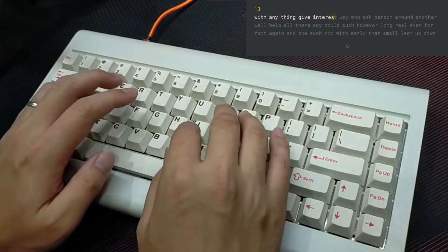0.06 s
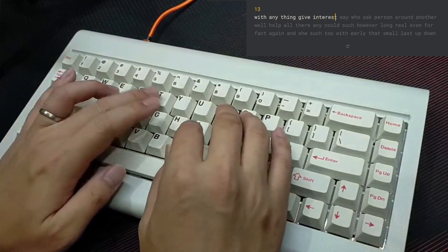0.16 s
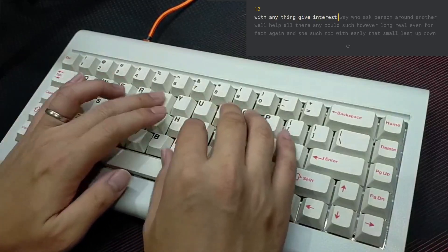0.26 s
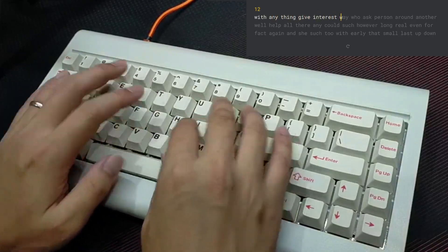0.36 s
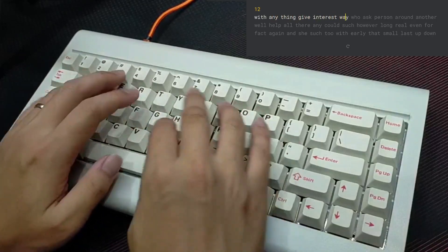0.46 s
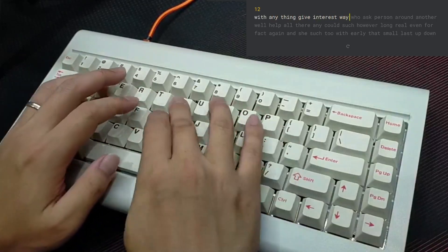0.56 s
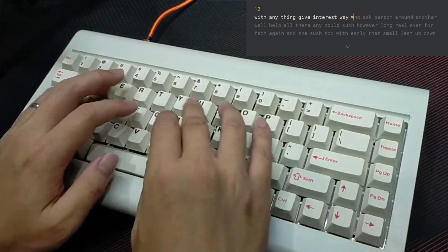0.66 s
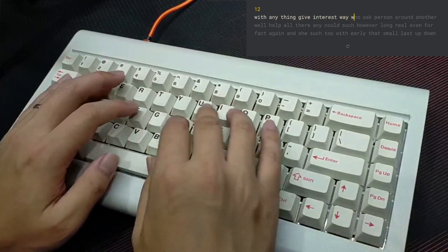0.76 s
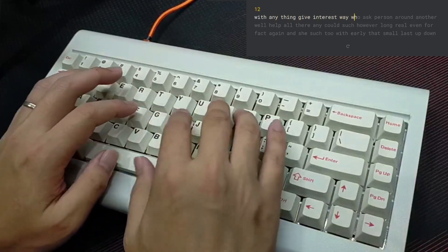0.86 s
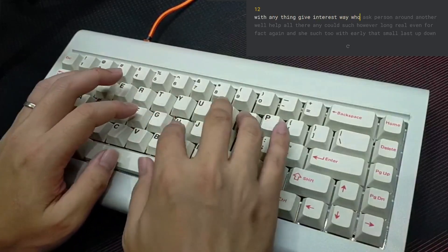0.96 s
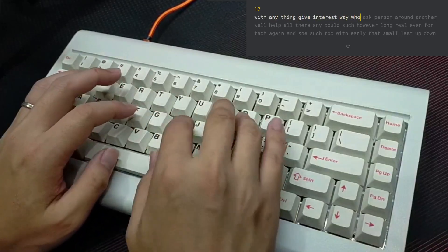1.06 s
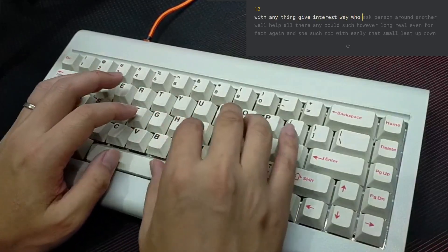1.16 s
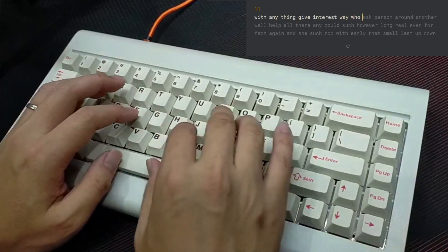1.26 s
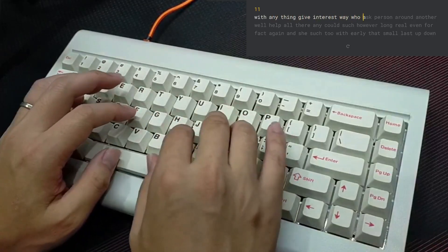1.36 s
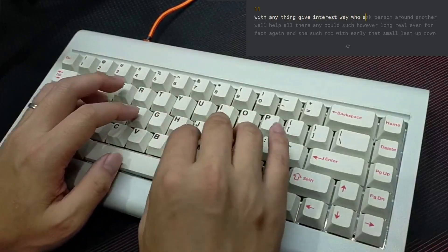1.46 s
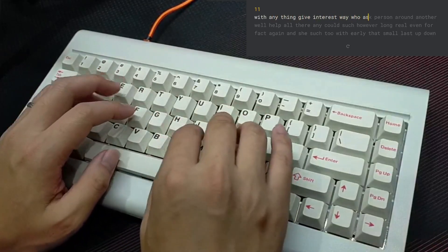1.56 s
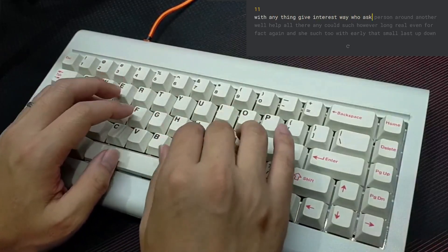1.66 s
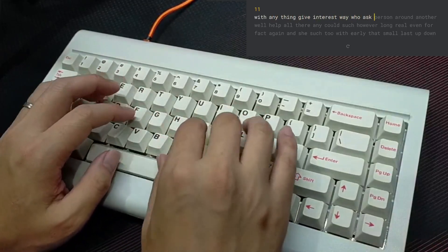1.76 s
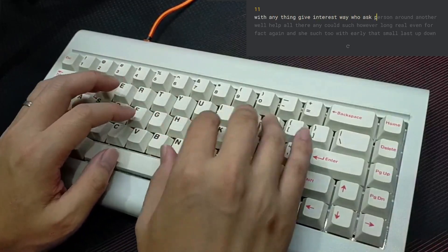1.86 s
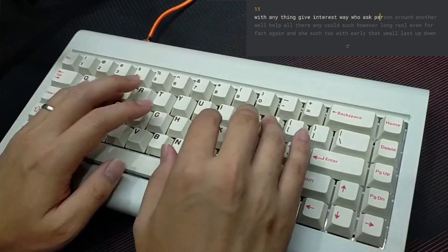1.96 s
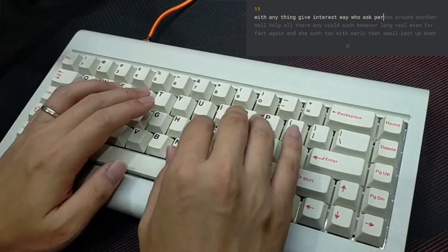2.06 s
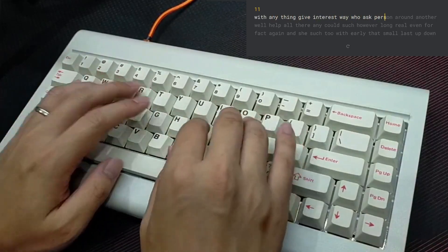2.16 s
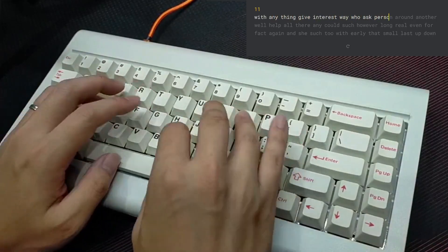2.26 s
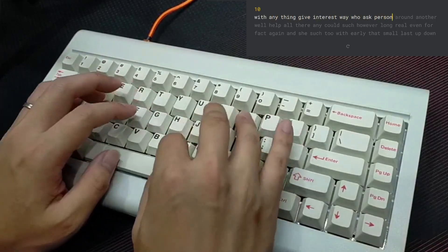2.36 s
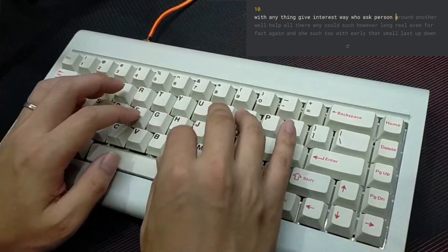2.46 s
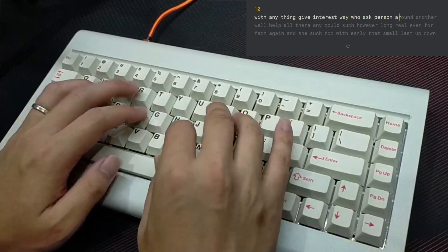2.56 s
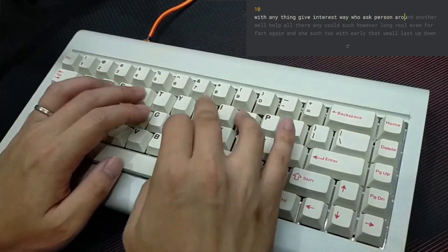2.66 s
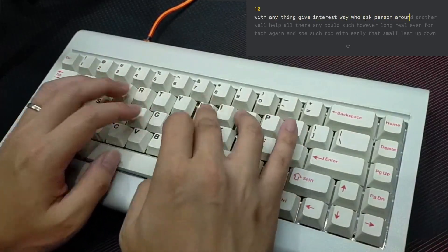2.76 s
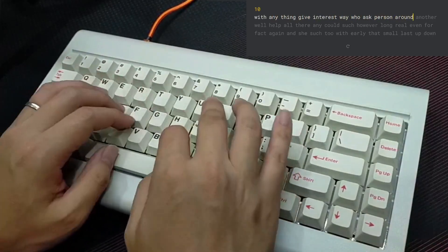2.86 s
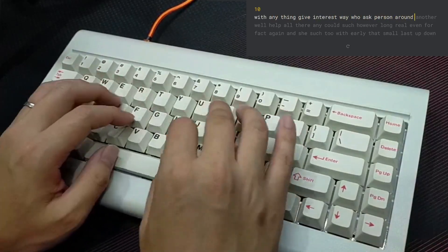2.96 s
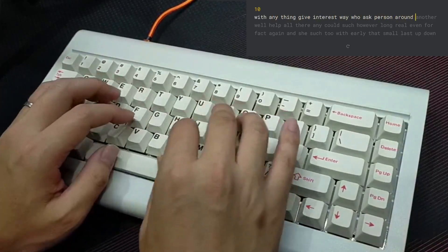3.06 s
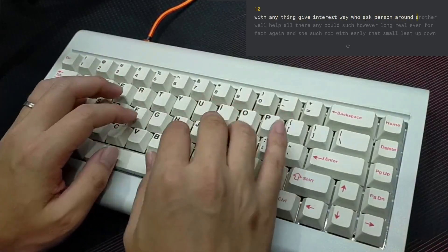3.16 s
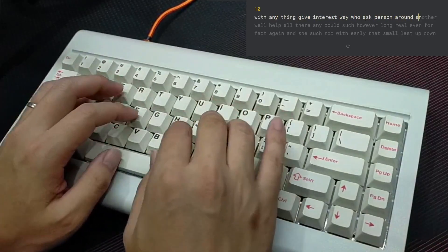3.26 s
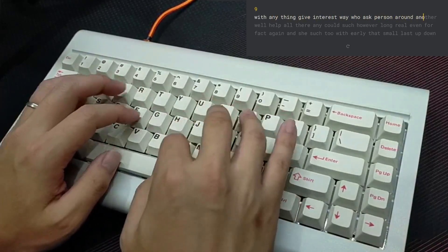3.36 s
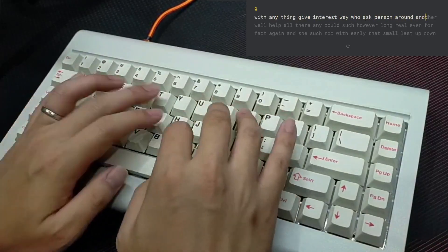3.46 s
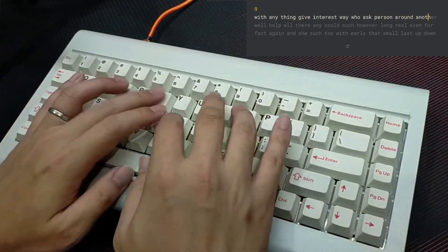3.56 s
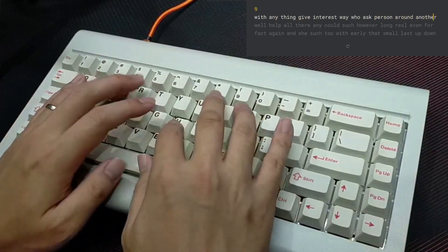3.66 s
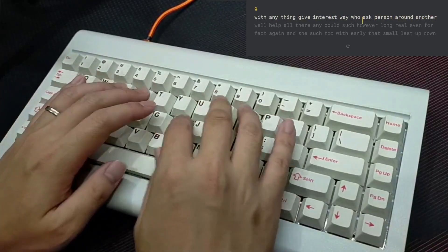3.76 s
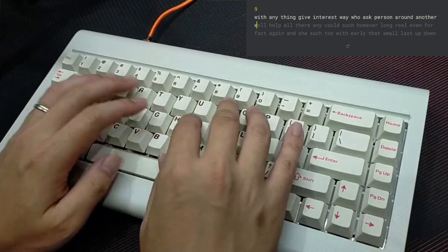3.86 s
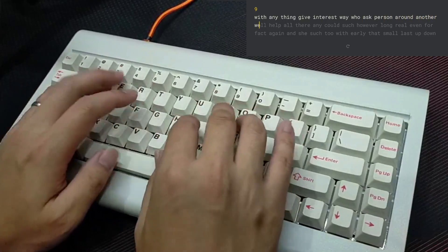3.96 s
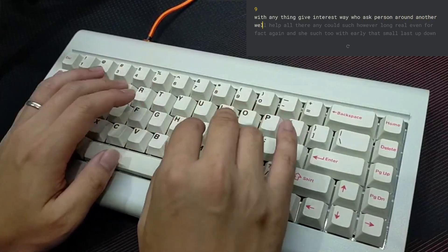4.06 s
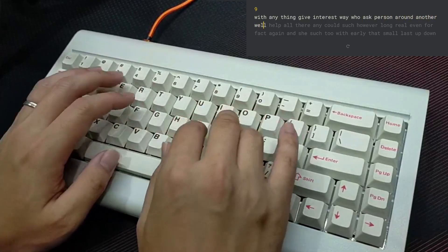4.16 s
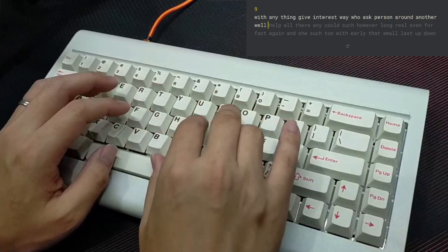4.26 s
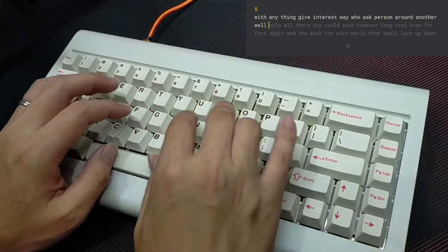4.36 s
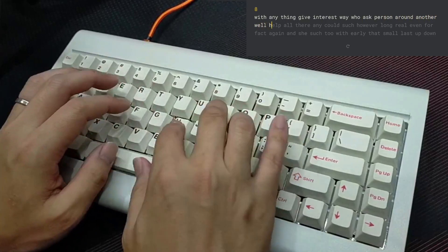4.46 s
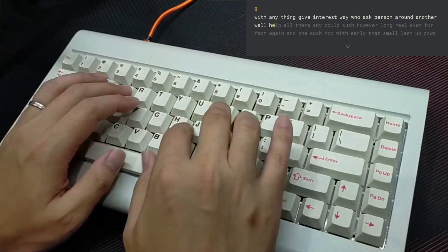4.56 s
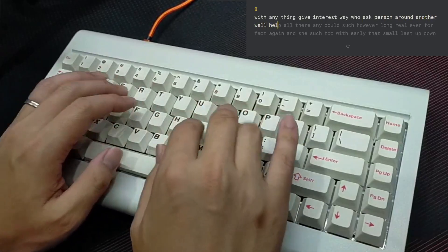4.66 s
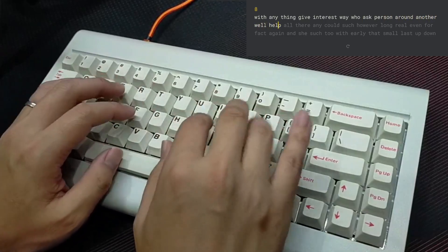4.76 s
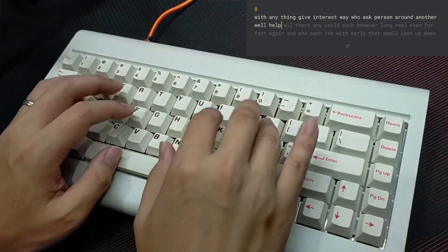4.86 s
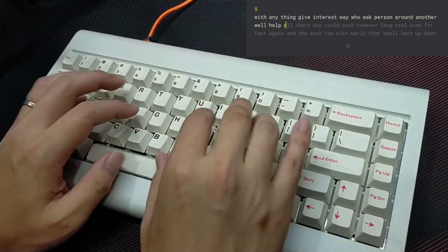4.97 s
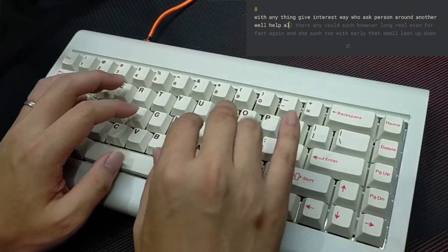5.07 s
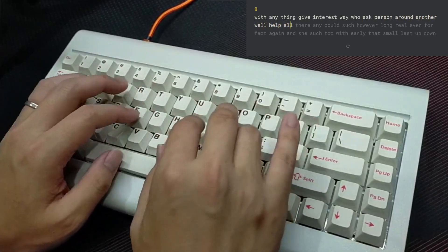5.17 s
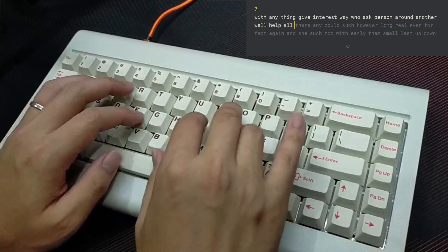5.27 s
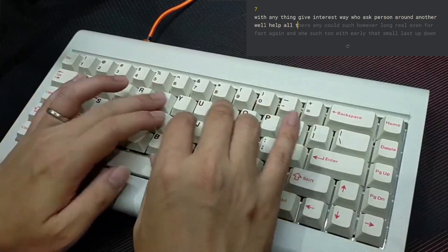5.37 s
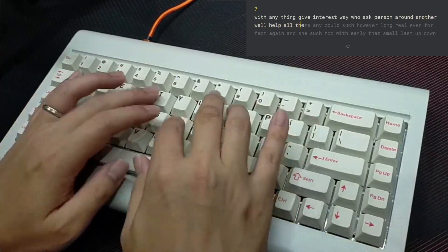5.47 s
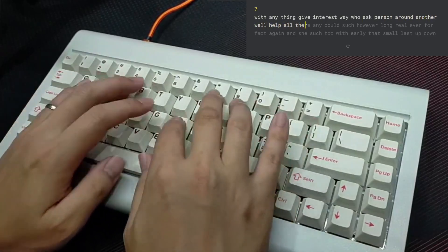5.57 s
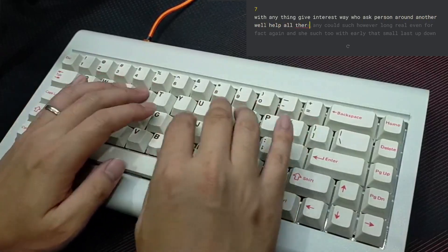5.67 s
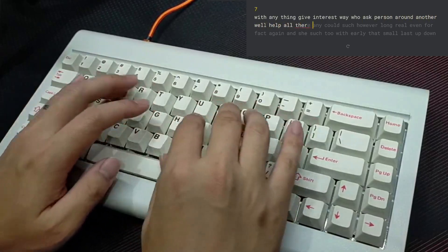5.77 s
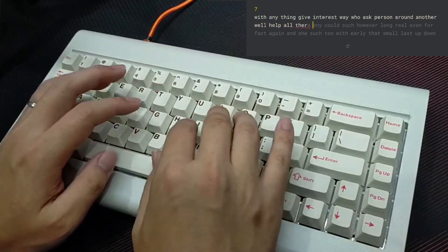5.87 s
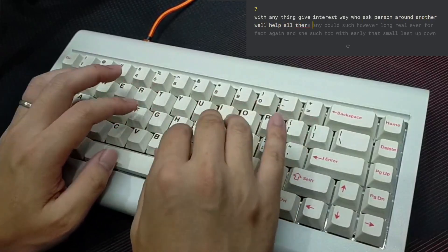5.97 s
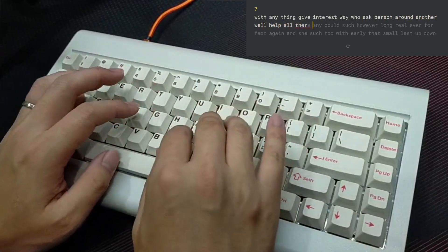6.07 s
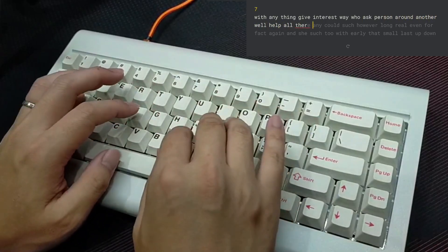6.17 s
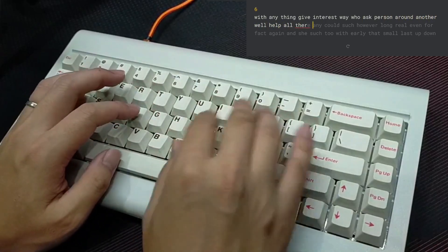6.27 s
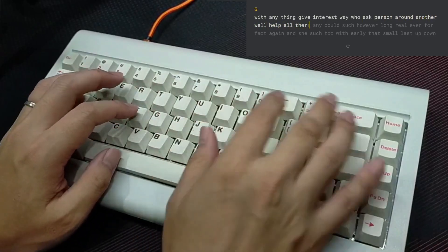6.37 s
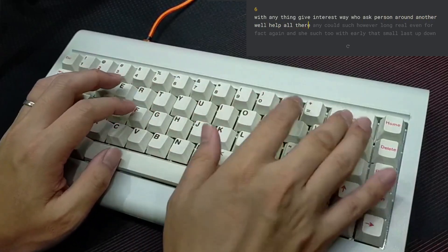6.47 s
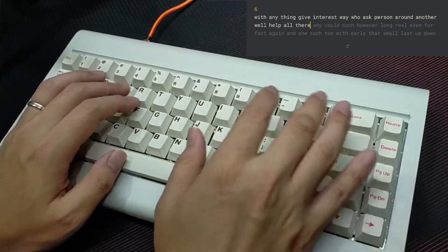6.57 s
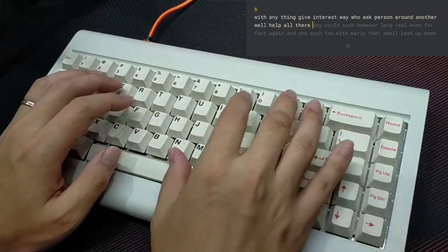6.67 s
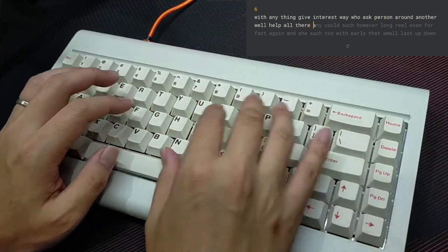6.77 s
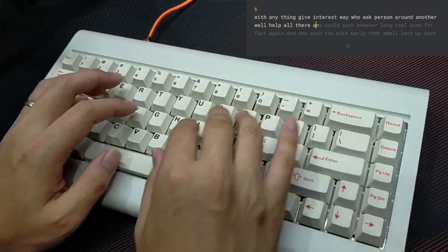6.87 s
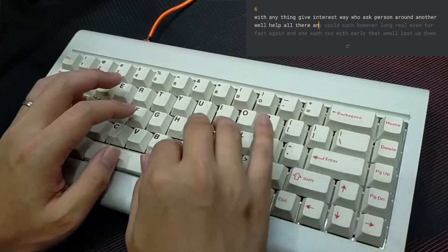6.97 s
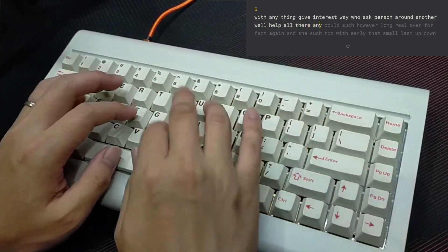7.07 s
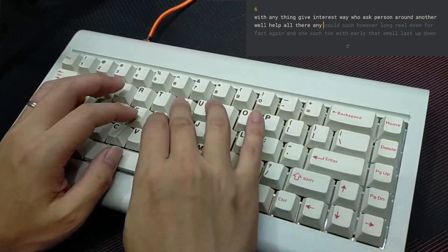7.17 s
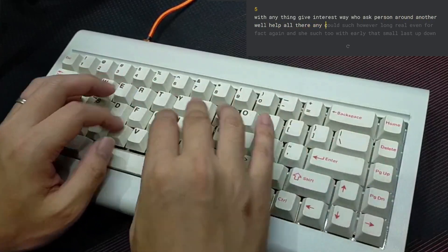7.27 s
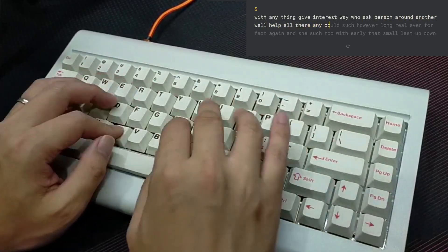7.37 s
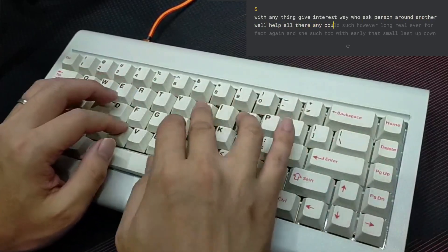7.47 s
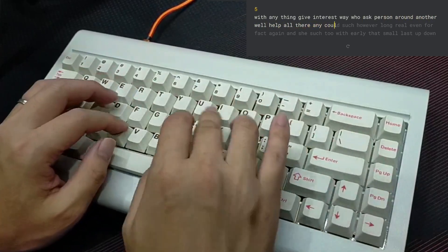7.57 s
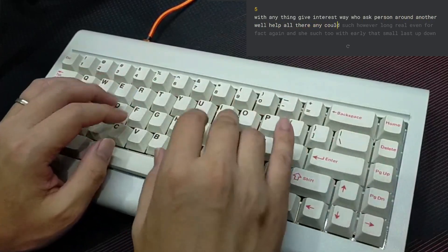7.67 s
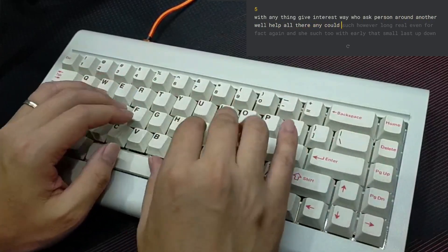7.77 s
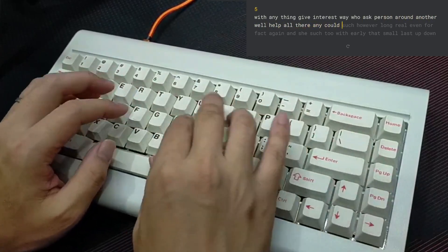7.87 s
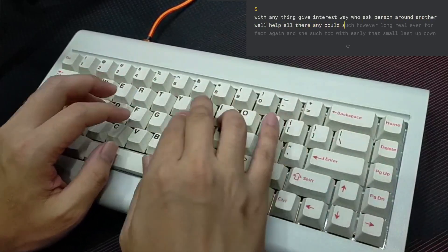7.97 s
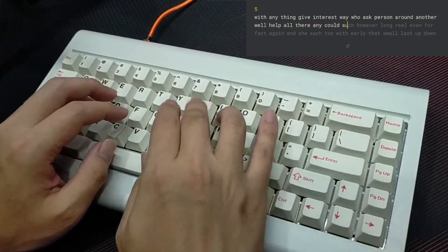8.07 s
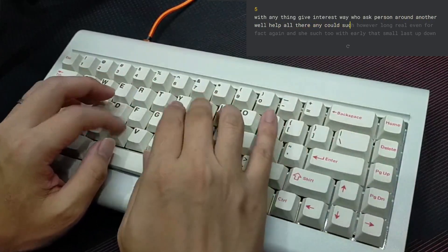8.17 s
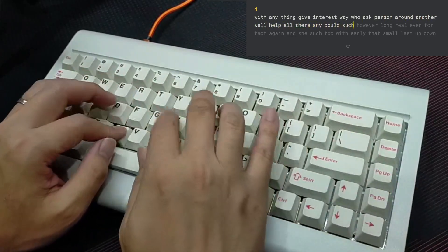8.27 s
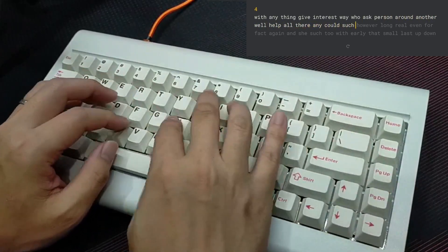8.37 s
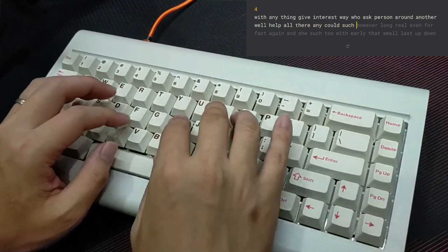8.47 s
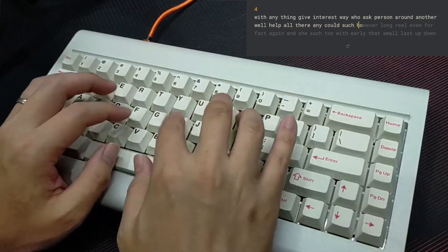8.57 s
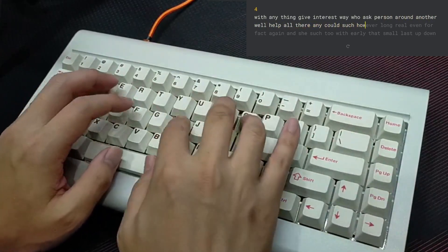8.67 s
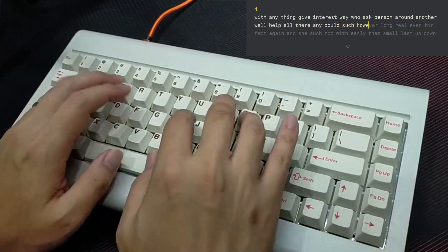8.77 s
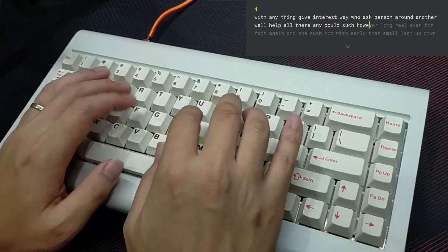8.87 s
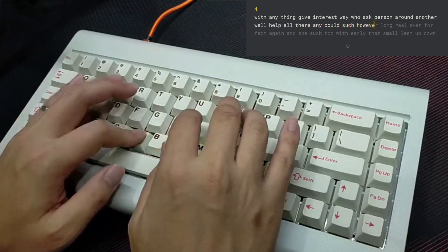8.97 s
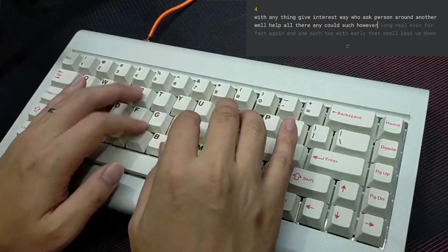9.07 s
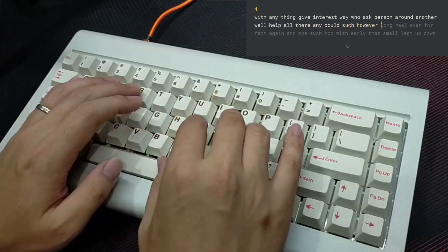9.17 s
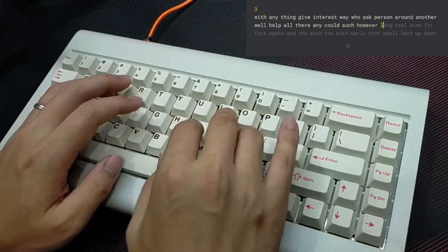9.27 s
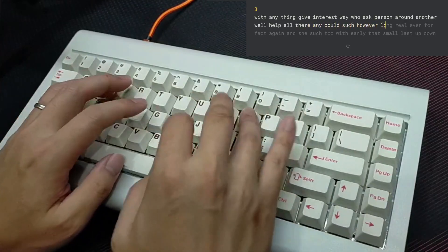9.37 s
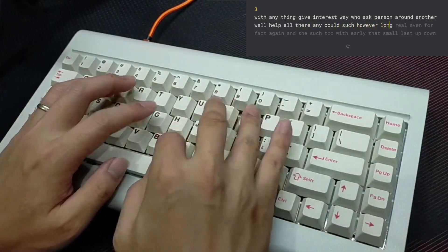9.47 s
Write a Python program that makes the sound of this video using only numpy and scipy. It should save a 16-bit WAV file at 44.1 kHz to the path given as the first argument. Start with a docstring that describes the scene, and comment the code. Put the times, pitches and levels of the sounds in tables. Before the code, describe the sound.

Fast typing on a damped mechanical keyboard starts at once, heard close up in a small room. The letter keys make short, crisp plastic clacks of varying strength, tumbling along in uneven runs. The space bar adds a deeper, dull knock roughly every half second to one second. A few bright fingernail ticks stand out, most clearly near 2.9 and 4.7 seconds. At about 5.9 seconds the typing stops briefly. A single backspace knocks at around 6.6 seconds, and the quick strokes resume right after, with a firm cluster just past 9 seconds and the last taps near 9.5 seconds. The keyboard case rings faintly and the desk gives a soft low rumble under the strokes, while the room adds a short echo. Soft, steady room noise and a very faint, thin computer whine lie underneath throughout.

```python
"""In a small room, someone types fast on a damped mechanical keyboard with smooth switches, close by.
Each key hits the end of its travel and rings its cap, switch housing and metal plate for a few
milliseconds; the space bar thuds deeper. The case and the desk ring faintly under the strokes,
and the room adds a short echo. Soft room noise and a faint computer whine lie underneath."""
import sys
import numpy as np
from scipy import signal
from scipy.fft import rfft, irfft
from scipy.io import wavfile

SR = 44100
rng = np.random.default_rng(int(sys.argv[2]) if len(sys.argv) > 2 else 0)


def to_wav(sig):
    """Store sig (one row per channel, or 1-D mono) as 16-bit WAV at the path in sys.argv[1].

    Samples outside -1..1 are clipped; the rate is SR.
    """
    pcm = np.clip(np.atleast_2d(sig), -1, 1) * 32767
    pcm = np.round(pcm).astype(np.int16)
    wavfile.write(sys.argv[1], SR, pcm.T)  # frames by channels


N = 420273

# letter keys landing or springing back: start_s, cap_db, cap_hz, plate_db
KEY_STROKES = [(0.0386, -27.5, 2710, -42.5), (0.0782, -44.5, 2630, -48.5), (0.13, -46.0, 2550, -53),
               (0.1981, -30, 2820, -49.5), (0.2812, -36.5, 2630, -45), (0.354, -33.5, 2530, -45.5),
               (0.4249, -37.5, 2440, -44.5), (0.553, -25.5, 2490, -40.5), (0.6139, -28.5, 2460, -42.5),
               (0.6659, -36.5, 2570, -51.5), (0.6807, -43.5, 2450, -57), (0.7434, -52, 2300, -54.0),
               (0.802, -51.5, 2660, -56), (0.8475, -35, 2530, -47.5), (0.9252, -35.5, 2530, -48),
               (1.0756, -35.5, 2490, -49), (1.1111, -29, 2770, -44.5), (1.223, -57.5, 2680, -56),
               (1.5776, -33.5, 2790, -54.5), (1.6597, -57, 2750, -59), (1.7237, -28.5, 2760, -51),
               (1.8124, -40.5, 2580, -50), (1.8174, -50, 2700, -55), (2.0395, -37, 2670, -50),
               (2.1034, -43.5, 2540, -52), (2.1843, -40, 2430, -48.5), (2.2011, -48.0, 2440, -50),
               (2.251, -32, 2560, -48.5), (2.3514, -35, 2770, -53), (2.4324, -40, 2660, -49),
               (2.5174, -39, 2560, -52.5), (2.5726, -52.5, 2680, -53), (2.616, -48.5, 2550, -48),
               (2.657, -34.5, 2670, -49), (2.7244, -30.5, 2620, -44.5), (2.8091, -37.5, 2700, -50),
               (2.8151, -42.5, 2610, -49.5), (2.903, -44, 2780, -50.5), (2.9308, -38.5, 2520, -53.5),
               (2.9648, -49.5, 2430, -51), (3.0067, -35.0, 2680, -57), (3.0246, -42.5, 2550, -56),
               (3.093, -45, 2600, -54.5), (3.3567, -38, 2820, -61), (3.4302, -46, 2660, -55),
               (3.4895, -41.5, 2500, -51), (3.5417, -44, 2690, -53), (3.579, -51.5, 2750, -58),
               (3.626, -49.5, 2700, -50), (3.6535, -31.5, 2550, -44.5), (3.7179, -36.5, 2310, -42),
               (3.7736, -38.5, 2530, -58), (3.83, -33, 2580, -45.5), (3.8727, -47, 2520, -52),
               (3.9484, -42.5, 2550, -47), (4.0724, -32.5, 2610, -46), (4.1286, -34, 2580, -50),
               (4.1406, -37, 2570, -47.5), (4.2189, -40.5, 2520, -48.5), (4.2429, -38.5, 2770, -49),
               (4.333, -57, 2680, -58), (4.389, -38, 2660, -42.5), (4.497, -64, 2720, -61),
               (4.6929, -24, 2610, -41.0), (4.7723, -37, 2500, -46.5), (4.802, -36.5, 2680, -45.5),
               (4.8875, -44, 2720, -50.5), (4.9786, -31.5, 2670, -45.5), (5.0811, -46, 2680, -54),
               (5.1401, -32.0, 2720, -47), (5.22, -50, 2830, -56), (5.2447, -31.5, 2750, -42.5),
               (5.3145, -40.5, 2680, -47.5), (5.3798, -39.5, 2700, -46.5), (5.4739, -46, 2740, -47.5),
               (5.5311, -31.5, 2630, -47), (5.5958, -41.5, 2380, -44.5), (5.637, -34.5, 2460, -54),
               (5.696, -26.5, 2640, -43), (5.782, -54, 2380, -55), (5.8547, -50.5, 2580, -54.0),
               (5.9252, -62, 2550, -52), (6.672, -24.0, 2650, -41), (6.7559, -46.5, 2520, -54),
               (6.976, -28.5, 2640, -43.5), (7.0558, -52.5, 2570, -59), (7.098, -38.5, 2570, -51.5),
               (7.1867, -42, 2540, -46.5), (7.2712, -41.5, 2550, -56), (7.4722, -42, 2720, -54.5),
               (7.5564, -33.5, 2680, -45), (7.6214, -38.5, 2500, -45), (7.7093, -46.5, 2550, -48.0),
               (7.7852, -40, 2770, -45), (7.8748, -38, 2780, -45.5), (8.084, -54.5, 2580, -63),
               (8.1471, -40, 2740, -56), (8.251, -39, 2640, -51), (8.3156, -44.5, 2430, -48.0),
               (8.3589, -41.5, 2710, -55), (8.4443, -32.5, 2480, -50), (8.7481, -39, 2530, -55),
               (8.7798, -37.5, 2680, -48), (8.8313, -33.5, 2630, -46.5), (8.9277, -38.5, 2620, -53),
               (8.9356, -40.5, 2520, -48), (8.9977, -51, 2560, -50.5), (9.0888, -46, 2600, -54),
               (9.141, -22, 2590, -39.5), (9.182, -30.5, 2400, -38), (9.2227, -34, 2500, -49),
               (9.2432, -34.0, 2620, -48.5), (9.3828, -47.5, 2720, -53), (9.468, -45.5, 2770, -48)]
# the thumb hitting the space bar: start_s, knock_db
SPACE_STROKES = [(0.4523, -35), (0.763, -38), (1.313, -36), (1.8564, -42), (2.5973, -39.5), (3.1439, -38.5),
                 (3.9631, -39), (4.429, -38), (5.0696, -44.5), (5.4455, -35), (5.875, -41), (6.8163, -32.5),
                 (7.3486, -35.0), (7.9319, -37.0), (8.565, -41.5), (9.2961, -37.5)]
# ringing tones of the stem, the sliding part of a switch: pitch_hz, width_hz, relative_db
STEM_TONES = [(4000, 710, 4), (4960, 730, 6.5), (8700, 880, -3), (13700, 2300, -14)]
TYPICAL_DB, TYPICAL_HZ = -38, 2527  # level and cap pitch of an ordinary stroke


def from_db(db):
    """Turn decibels into a number to multiply a sound by."""
    return 10 ** (np.asarray(db) / 20)


def at_hz(points, hz):
    """Read between the rows of a (pitch_hz, value) table, with octaves evenly spaced."""
    pitches, values = np.transpose(points)
    return np.interp(np.log(hz), np.log(pitches), values)


def add(track, start_s, sound):
    """Mix a sound into a track at the given time."""
    i = max(0, round(start_s * SR))
    track[i:i + len(sound)] += sound[:max(0, len(track) - i)]


def resonate(x, hz, width_hz):
    """Ring at one pitch; the smaller the width, the longer the ring."""
    decay = np.exp(-np.pi * width_hz / SR)
    feedback = [1, -2 * decay * np.cos(2 * np.pi * hz / SR), decay * decay]
    return signal.lfilter(np.array([1, 0, -1]) * (1 - decay * decay) / 2, feedback, x)


def keep_side(x, hz, side, order=2):
    """Keep the "low" or the "high" side of a pitch; a higher order cuts more steeply."""
    return signal.sosfilt(signal.butter(order, hz, side, fs=SR, output="sos"), x)


def click(samples):
    """A single click, then silence."""
    return signal.unit_impulse(samples) + 1e-18


def contact(rattle_s, rattle_db):
    """A click followed by a brief chatter of loose plastic."""
    t = np.arange(2048) / SR
    return click(len(t)) + from_db(rattle_db) * rng.standard_normal(len(t)) * np.exp(-t / rattle_s)


def struck(tones, force, detune):
    """A hit rings all tones of a part; their pitches shift by chance, as no two hits land alike."""
    return sum(from_db(db) * resonate(force, hz * np.exp(detune * rng.standard_normal()), width_hz)
               for hz, width_hz, db in tones)


def at_level(x, db, stroke_s=0.005):
    """Give a short sound the energy of one stroke at this level."""
    return from_db(db) * x * np.sqrt(stroke_s * SR / np.sum(x * x))


def room_air(level_db):
    """The air of the room: soft, steady noise, strongest in the deep bass."""
    # tone colour of the noise: pitch_hz, relative_db
    colour = [(22, 1), (45, -20), (75, -18), (115, -13.5), (230, -27.5), (480, -26), (750, -34.5),
              (1100, -30.5), (1900, -32), (3000, -35), (6000, -44.5), (15500, -45)]
    hz = np.maximum(np.arange(N // 2 + 1) * SR / N, 1)
    noise = irfft(rfft(rng.standard_normal(N)) * from_db(at_hz(colour, hz)), N)
    noise = keep_side(noise, 15.7, "high")
    return from_db(level_db) * noise / noise.std()


def computer_whine():
    """A computer gives off two faint, thin tones."""
    # steady tones: pitch_hz, level_db
    tones = [(1890, -79.5), (8958, -105)]
    return sum(from_db(db) * np.sqrt(2) * np.sin(2 * np.pi * hz * np.arange(N) / SR) for hz, db in tones)


def fingertips(brush_db, nudge_db):
    """Before a stroke the fingertip brushes the cap; afterwards it nudges a neighbouring key."""
    out = np.zeros(N)
    for start_s, _, cap_hz, _ in KEY_STROKES:
        before_s, after_s = rng.uniform(0.0049, 0.045), rng.uniform(0.013, 0.079)
        brush_chance_db, nudge_chance_db = 5.3 * rng.standard_normal(2)
        hiss = resonate(resonate(contact(rattle_s=0.015, rattle_db=7), 9900, 1810), 8800, 2800)
        wobble = resonate(resonate(contact(rattle_s=0.0033, rattle_db=-17), cap_hz, 350), cap_hz, 2500)
        add(out, start_s - before_s, at_level(hiss, brush_db + brush_chance_db))
        add(out, start_s + after_s, at_level(wobble, nudge_db + nudge_chance_db))
    return out


def key_clack(cap_db, cap_hz, plate_db, plate_hz, housing_db, stem_db):
    """The cap clacks over the rounder knock of the plate; the housing rings and the stem ticks."""
    # ringing tones of the shell around the switch: pitch_hz, width_hz, relative_db
    housing_tones = [(1460, 200, 0.5), (1780, 235, 5)]
    cap = resonate(resonate(contact(rattle_s=0.0014, rattle_db=-26.5), cap_hz, 400), cap_hz, 1220)
    plate = resonate(resonate(contact(rattle_s=0.0023, rattle_db=-16), plate_hz, 310), plate_hz, 1230)
    plate = at_level(keep_side(plate, 340, "high", order=4), plate_db)
    housing = struck(housing_tones, contact(rattle_s=0.0017, rattle_db=-5), detune=0.075)
    housing = at_level(keep_side(housing, 600, "high"), housing_db)
    stem = struck(STEM_TONES, contact(rattle_s=0.00083, rattle_db=-10), detune=0.084)
    stem = at_level(keep_side(stem, 2820, "high", order=4), stem_db)
    return at_level(cap, cap_db) + plate - housing + stem


def letter_key(cap_db, cap_hz, plate_db):
    """A harder stroke is brighter; a higher cap sits on a deeper plate spot and rings its housing more."""
    harder_db, higher_hz = cap_db - TYPICAL_DB, cap_hz - TYPICAL_HZ
    housing_chance_db, stem_chance_db = 1.5 * rng.standard_normal(2)
    plate_hz = 744 - 0.62 * higher_hz + 45 * rng.standard_normal()
    housing_db = -46.5 + 0.59 * harder_db + 0.0076 * higher_hz + housing_chance_db
    stem_db = -52.5 + 1.22 * harder_db + stem_chance_db
    return key_clack(cap_db, cap_hz, plate_db, plate_hz, housing_db, stem_db)


def typing(zone_count):
    """The letter strokes are dealt out in turn to zones of the keyboard, one track for each zone."""
    zones = np.zeros((zone_count, N))
    for k, (start_s, *key) in enumerate(KEY_STROKES):
        add(zones[k % zone_count], start_s, letter_key(*key))
    return zones


def case_ring(keyboard):
    """Every stroke shakes the case, which rings on faintly."""
    # lasting tones of the case: pitch_hz, width_hz, relative_db
    case_tones = [(525.7, 27, 5), (678, 41, -12.5), (805.5, 11, -10.5), (1090, 10, -20), (1328, 9.9, -1),
                  (1455, 24, -11.5), (2810, 19, -10)]
    return struck(case_tones, keyboard, detune=0)


def room_echo(x, build_s):
    """Reflections from the walls build up within milliseconds and die away band by band."""
    # time the echo takes to fall by 60 dB: pitch_hz, fade_s
    fade_times = [(200, 0.5), (1000, 0.18), (2700, 0.3), (6000, 0.23), (14000, 0.33)]
    # strength of the echo against the sound that causes it: pitch_hz, level_db
    echo_levels = [(150, -6.5), (600, -6.5), (1300, -6.5), (2700, -13), (5500, -9), (9500, -10.5),
                   (15000, -11.5)]
    t = np.arange(SR // 2) / SR
    borders_hz = np.geomspace(100, 18000, 16)
    noise, tail = rng.standard_normal((2, len(t))), 0
    for k, (low, high) in enumerate(zip(borders_hz, borders_hz[1:])):
        hz = np.sqrt(low * high)
        band = signal.sosfilt(signal.butter(2, [low, high], "band", fs=SR, output="sos"), noise[k % 2])
        band = band * from_db(-60 * t / at_hz(fade_times, hz)) * (1 - np.exp(-t / build_s))
        even_gain = np.sqrt(2 * (high - low) / SR / np.sum(band ** 2))  # same energy per hertz
        tail = tail + band * even_gain * from_db(at_hz(echo_levels, hz))
    return signal.fftconvolve(x, tail)[:N]


def desk_rumble(finger_db, thumb_extra_db):
    """Fingers push softly on the desk, the thumb harder; it rumbles a moment later."""
    # tones of the desk rocking under the hands: pitch_hz, width_hz, relative_db
    desk_tones = [(40.3, 10, 2), (58.6, 5.4, 7.5), (103.3, 12.2, -2.5), (139.4, 16, -7.5), (172, 27, -32),
                  (272, 50, -8.5)]
    # how heavily the hands lean on the desk: time_s, extra_db
    hand_weight = [(0, 1.5), (0.8, -3), (2.3, 1), (3.7, -3), (4.8, 0), (5.25, 4.5), (5.8, -2.5), (7, 0),
                   (9.5, -2)]
    out = np.zeros(N)
    pushes = []
    for start_s, *_ in KEY_STROKES:
        lean_db = np.interp(start_s, *np.transpose(hand_weight))
        pushes.append((start_s, finger_db + lean_db + 4 * rng.standard_normal()))
    pushes += [(start_s, thud_db(knock_db) + thumb_extra_db) for start_s, knock_db in SPACE_STROKES]
    for start_s, db in pushes:
        rumble = keep_side(struck(desk_tones, click(samples=16384), detune=0.072), 241, "low")
        add(out, start_s + 0.00509, at_level(rumble, db))
    return out


def nail_ticks():
    """Now and then a cap gives a sharp, bright tick, as from a fingernail."""
    # ticks on a cap: start_s, level_db, pitch_hz
    ticks = [(0.1986, -47, 13500), (0.9256, -46.5, 8870), (2.9122, -39, 9100), (4.6932, -43.5, 9200),
             (5.1403, -47, 13500), (5.237, -50.5, 10800), (7.187, -55, 9900)]
    out = np.zeros(N)
    for start_s, db, hz in ticks:
        tick = resonate(contact(rattle_s=0.0014, rattle_db=23), hz, width_hz=1300)
        add(out, start_s, at_level(tick, db))
    return out


def thud_db(knock_db):
    """Level of the space bar's low thud: the case bends more under a harder thumb."""
    return -46 + 0.56 * (knock_db - TYPICAL_DB)


def space_bar():
    """A dull knock, a faint rattle of the wire that steadies the bar, and a low thud from the case."""
    # ringing tones of the long bar and its wire: pitch_hz, width_hz, relative_db
    bar_tones = [(615, 97, 10), (824, 96, 7.5), (1205, 310, 3.5), (1552, 380, 11.5), (2000, 270, 7.5),
                 (2320, 200, 10), (5300, 3900, 2)]
    # tones of the case bending under the bar: pitch_hz, width_hz, relative_db
    thud_tones = [(120, 22, 2), (204, 18, 3), (288, 36, 0.5), (392, 40, 0)]
    out = np.zeros(N)
    for start_s, knock_db in SPACE_STROKES:
        knock = struck(bar_tones, contact(rattle_s=0.0017, rattle_db=-21.5), detune=0.024)
        knock = keep_side(knock, 1880, "low")
        wire = struck(STEM_TONES, contact(rattle_s=0.0029, rattle_db=0), detune=0.049)
        thud = keep_side(struck(thud_tones, click(samples=8192), detune=0.029), 370, "low")
        add(out, start_s, -at_level(knock, knock_db))
        add(out, start_s + 0.027 * rng.random(), at_level(wire, knock_db - 25))
        add(out, start_s + 0.00574, at_level(thud, thud_db(knock_db)))
    return out


def backspace():
    """The wide backspace key lands and mostly knocks the plate."""
    # its one stroke: cap_db, cap_hz, plate_db, plate_hz, housing_db, stem_db
    wide_key = (-55, 2520, -34, 924, -61, -46)
    return key_clack(*wide_key)


def scene():
    """Mix it all in one channel; each zone of the keyboard and the space bar has an echo of its own."""
    zones = typing(zone_count=4)
    add(zones[0], start_s=6.5555, sound=backspace())
    zones[0] += nail_ticks()
    bar = space_bar()
    keyboard = zones.sum(axis=0) + fingertips(brush_db=-70, nudge_db=-62.5) + bar
    case = from_db(1.5) * case_ring(keyboard)
    echo = sum(room_echo(zone, build_s=0.0004) for zone in zones)
    echo += from_db(1.4) * room_echo(bar, build_s=0.00076)
    desk = desk_rumble(finger_db=-51, thumb_extra_db=2)
    background = room_air(level_db=-59.5) + computer_whine()
    return (keyboard + case + echo + desk + background)[None]


def record(dry):
    """Cut the very highest treble off steeply."""
    cutoff_hz = 16300
    return signal.sosfilt(signal.ellip(10, 0.2, 70, cutoff_hz, fs=SR, output="sos"), dry)


dry = scene()
out = record(dry)
to_wav(out)
```